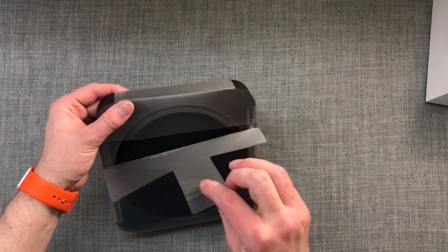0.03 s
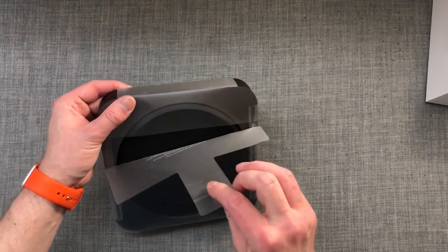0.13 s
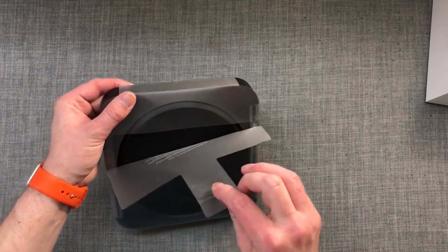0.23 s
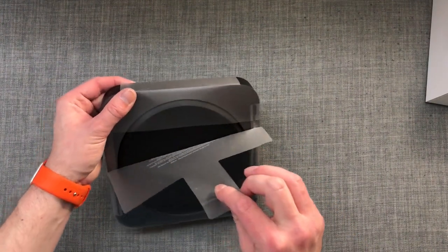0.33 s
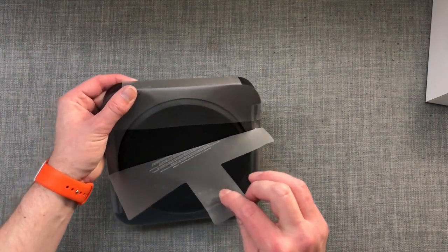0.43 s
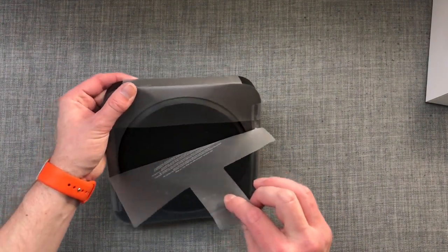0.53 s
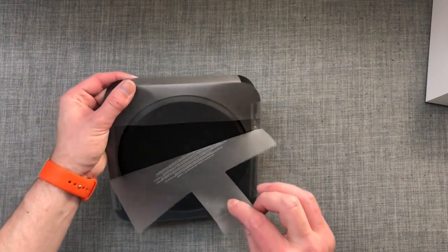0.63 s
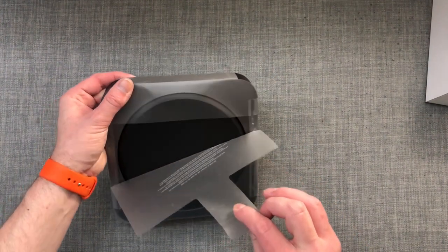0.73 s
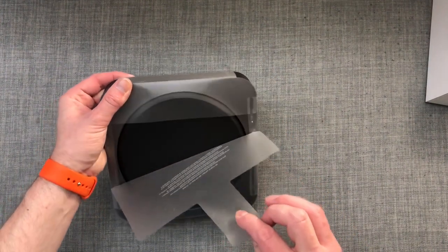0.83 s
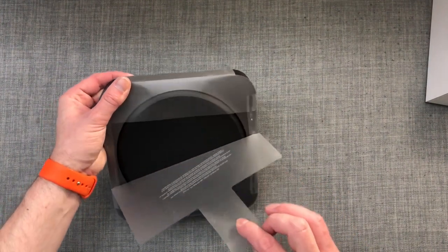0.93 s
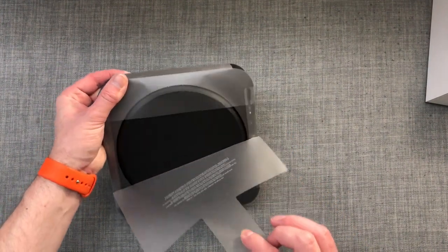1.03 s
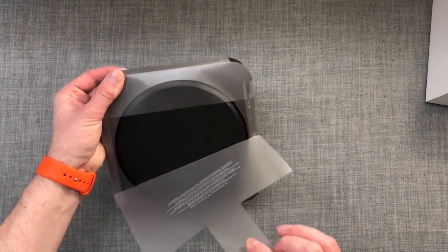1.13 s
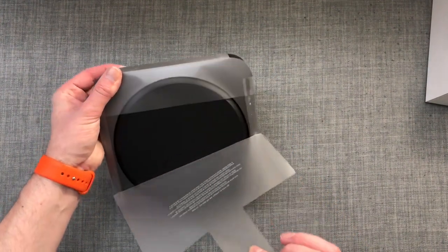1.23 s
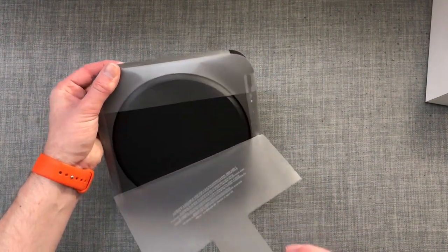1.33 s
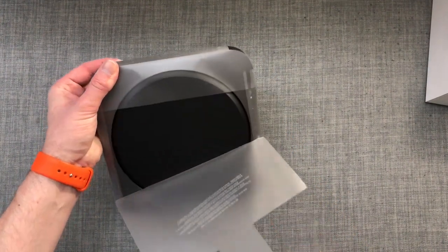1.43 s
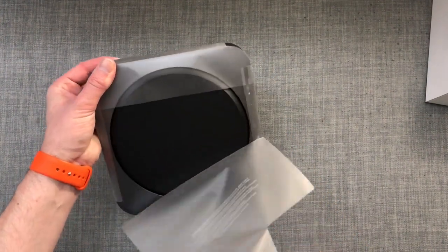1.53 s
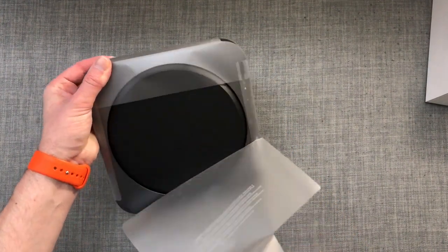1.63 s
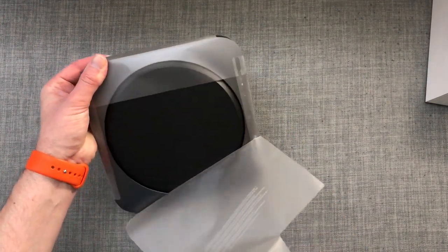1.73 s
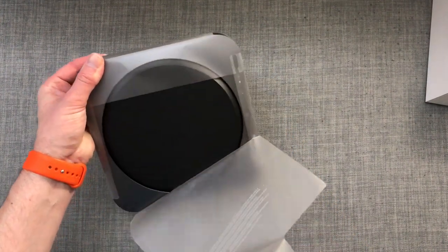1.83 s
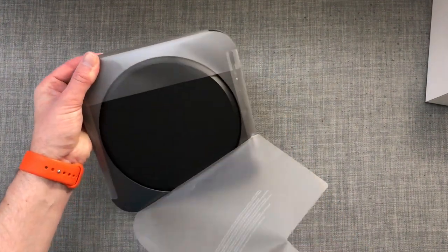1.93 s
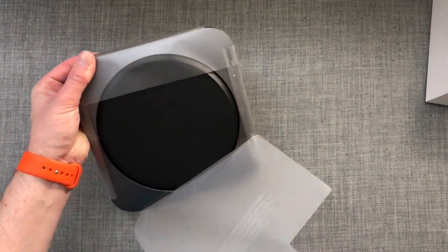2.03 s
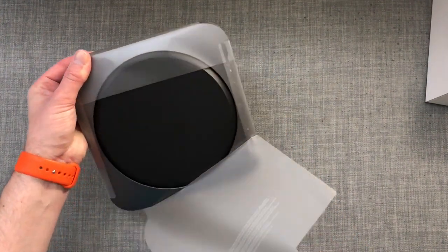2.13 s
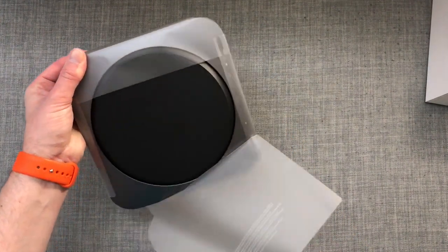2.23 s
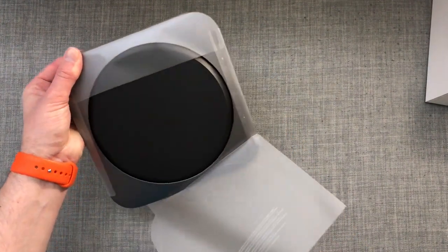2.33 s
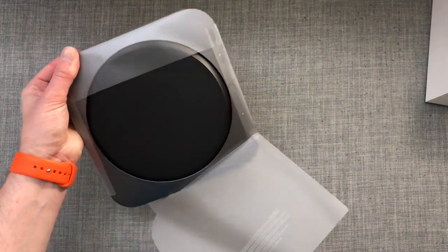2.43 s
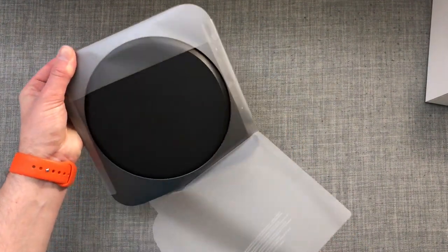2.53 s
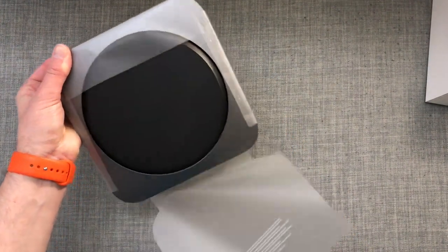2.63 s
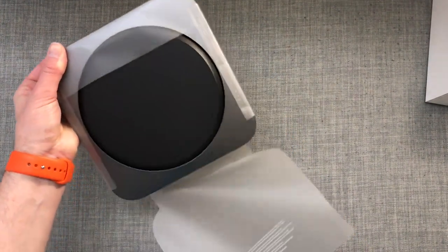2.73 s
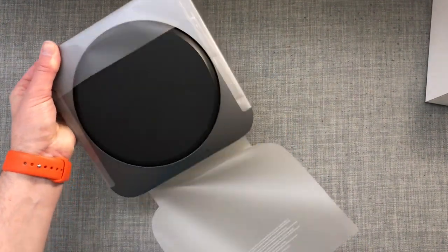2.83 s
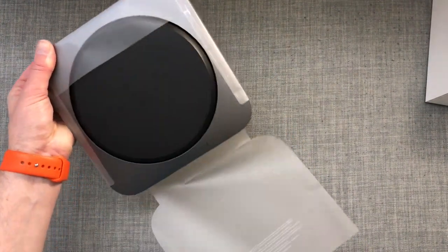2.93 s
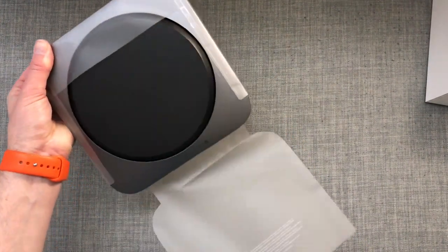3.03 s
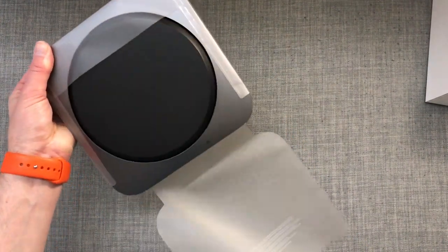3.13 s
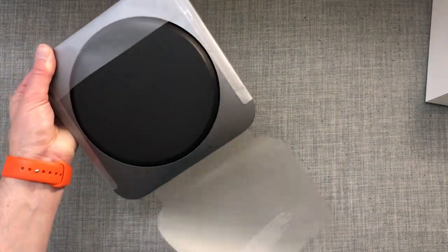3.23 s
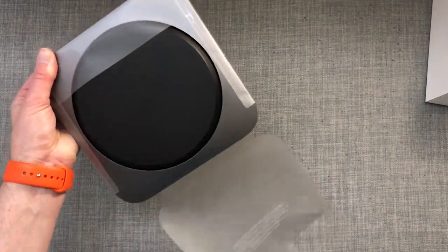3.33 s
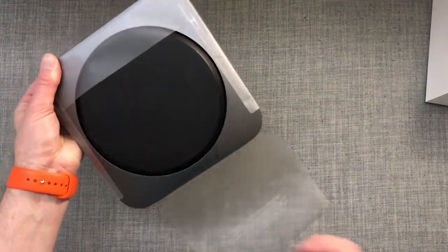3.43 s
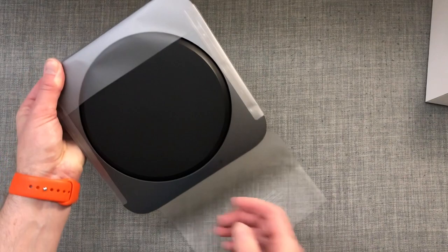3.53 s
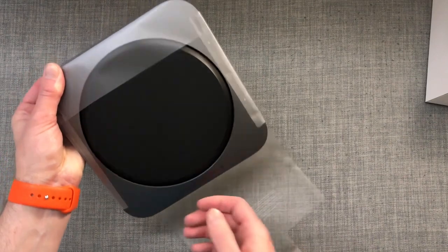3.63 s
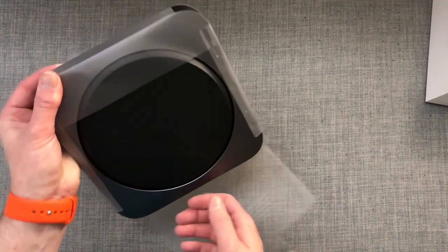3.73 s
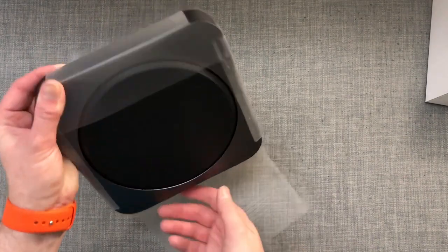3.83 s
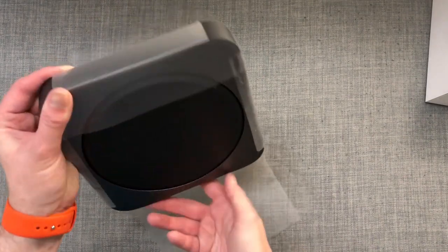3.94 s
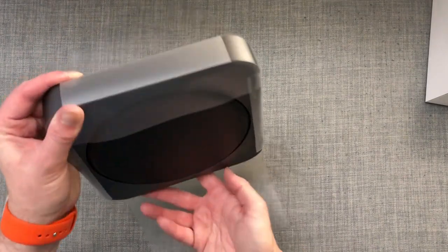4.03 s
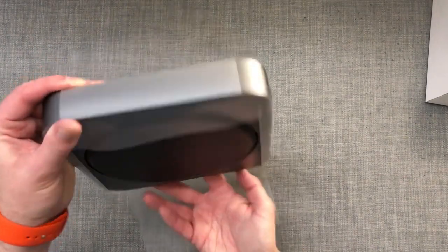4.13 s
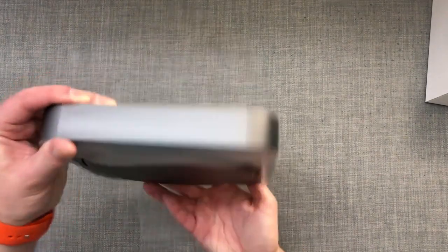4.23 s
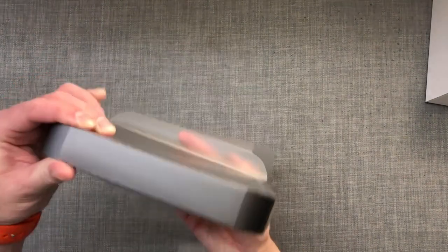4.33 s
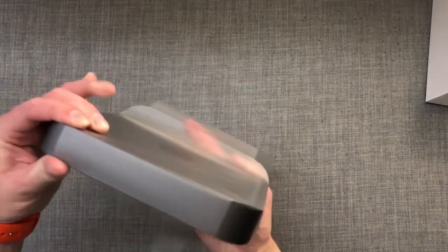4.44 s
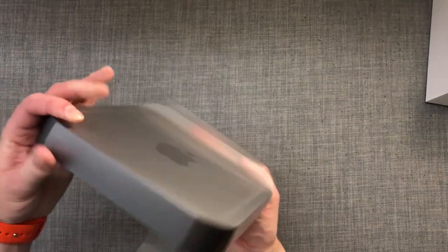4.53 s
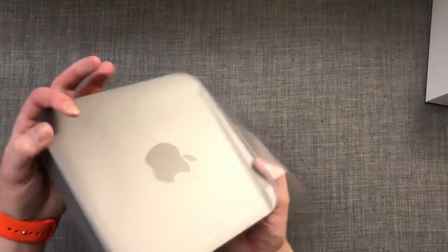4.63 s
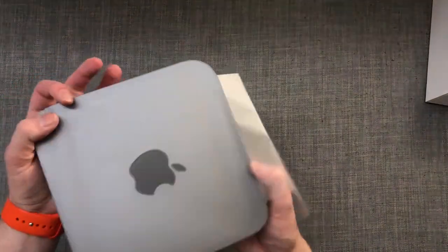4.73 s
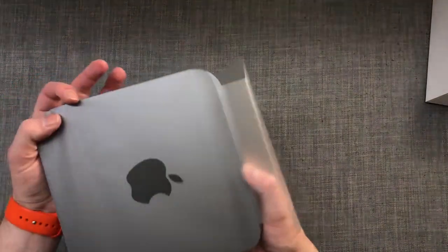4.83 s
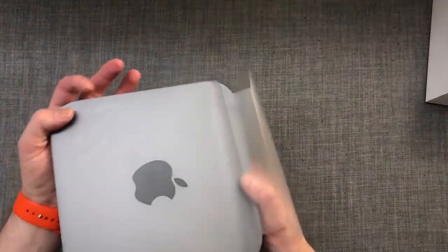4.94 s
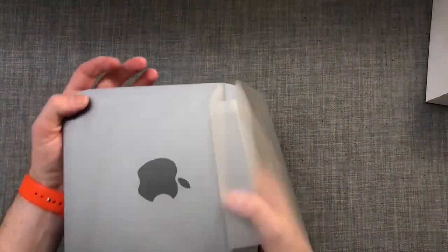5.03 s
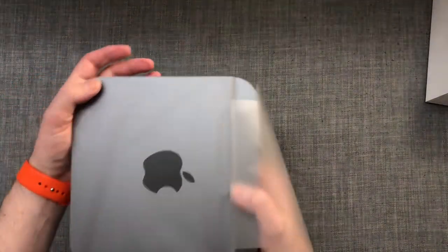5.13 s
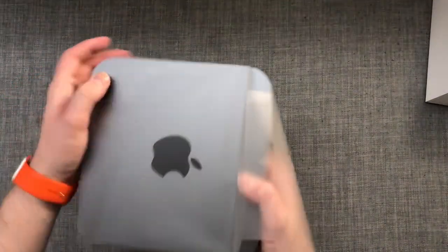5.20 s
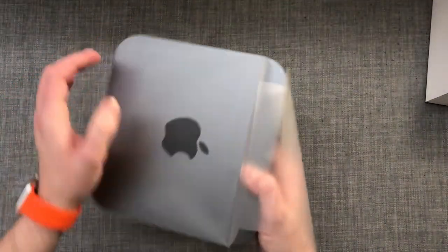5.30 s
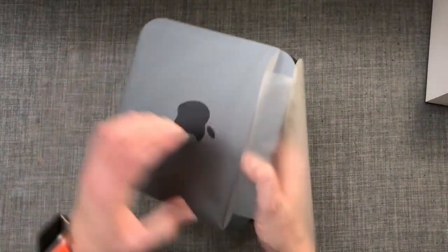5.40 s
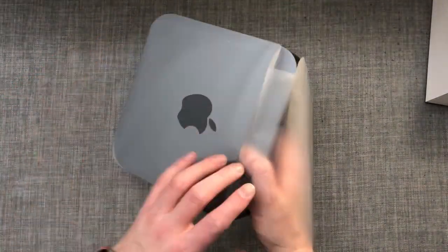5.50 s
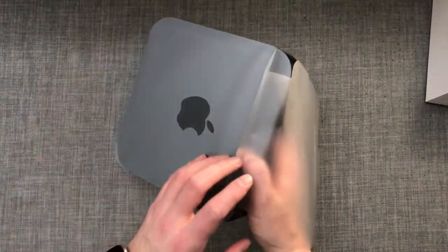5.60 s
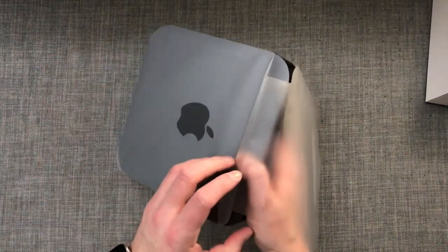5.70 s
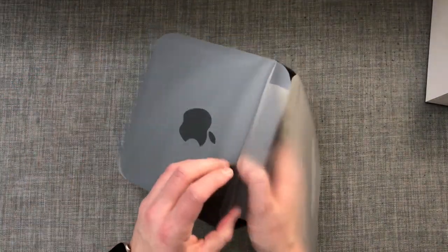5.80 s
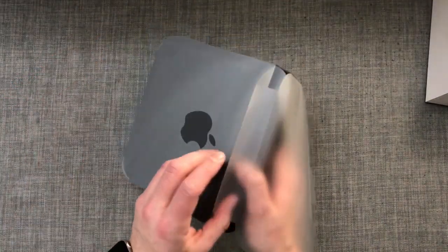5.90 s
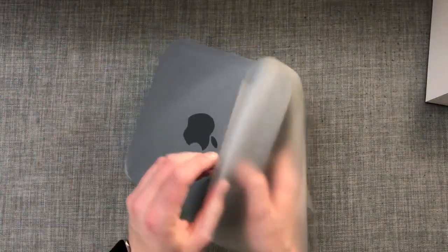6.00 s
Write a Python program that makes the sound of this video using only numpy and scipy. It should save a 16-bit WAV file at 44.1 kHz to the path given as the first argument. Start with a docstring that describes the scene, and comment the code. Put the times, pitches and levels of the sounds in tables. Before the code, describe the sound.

A quiet small room with very faint air noise and low mains hum, miked close over a cloth-covered table. From 0 s stiff film peels off a hollow metal box: bright, grainy adhesive hiss, uneven in strength, with a crisp click at the start, hard snaps around 0.7-0.8, 1.1 and 1.6 s, and light boxy thuds. The hiss thins towards 2 s; a sharp snap at 2.2 and a dense run of pops from 2.35 to 2.75 s finish the peel, with a last hissy surge near 2.7. Near silence follows, with tiny ticks and a short soft swish at 3.2 s. At 4.0 s a dull low handling bump, then faint squeaky finger drags at 4.2-4.4. Airy rustling strokes swell at 4.5-4.8, 5.05 and 5.25 s, with small ticks between. A quieter moment ends in a brighter film rustle from 5.9 s, with one loud snap at 5.96.

```python
"""A cloth-covered table in a quiet, humming room: stiff plastic wrap is peeled off a small metal box, close by.
Glue lets go as hiss: dense random ticks over noise, in bands. Creases snap: millisecond noise bursts with an echo.
Hands slide over film and lid: swelling strokes of the same rustle; dragged fingertips sing in narrow noise bands.
The hollow box thuds with the snaps and murmurs under the hands: noise through its low resonances."""
import sys
import numpy as np
from scipy import signal
from scipy.fft import rfft, irfft, next_fast_len
from scipy.io import wavfile
from scipy.ndimage import uniform_filter1d

SR = 44100
rng = np.random.default_rng(int(sys.argv[2]) if len(sys.argv) > 2 else 0)


def wrap_up_sound(samples):
    """Save the sound to the file named by the first command line argument, as 16-bit audio."""
    columns = np.atleast_2d(samples).T
    # keep every value between -1 and 1, then stretch to whole-number steps
    tamed = np.clip(columns, -1, 1)
    steps = np.round(tamed * 32767).astype(np.int16)
    wavfile.write(sys.argv[1], SR, steps)


N = 267366


def undb(db):
    """dB to gain."""
    return 10 ** (np.asarray(db) / 20)


def level(x, db):
    """Set the rms level."""
    return x * undb(db) / np.sqrt(np.mean(x ** 2))


def peak(x):
    """Scale to a peak of 1."""
    return x / np.max(np.abs(x))


def band(x, lo_hz, hi_hz, order=2):
    """Causal band-pass."""
    edges_hz = [lo_hz, min(hi_hz, .47 * SR)]
    return signal.sosfilt(signal.butter(order, edges_hz, "band", fs=SR, output="sos"), x)


def colour(x, points):
    """Shape the spectrum of a steady sound by (Hz, dB) points, interpolated over log frequency."""
    size = next_fast_len(len(x))
    hz, db = np.transpose(points)
    bin_hz = np.maximum(np.arange(size // 2 + 1) * SR / size, 1)
    gain = undb(np.interp(np.log(bin_hz), np.log(hz), db))
    return irfft(rfft(x, size) * gain, size)[:len(x)]


def walk(rate_hz):
    """Random levels held 1 / rate_hz seconds and smoothed twice; spread near 1."""
    hold = int(SR / rate_hz)
    steps = np.repeat(rng.standard_normal(N // hold + 1), hold)[:N]
    return 1.23 * uniform_filter1d(uniform_filter1d(steps, hold), hold)


# Room air spectrum. Each row: frequency in Hz, relative density in dB per Hz.
ROOM_SPECTRUM = [(15, -37.5), (25, -14.5), (72, -1.5), (129, -3), (169, -7), (291, -3.5), (570, -13.5),
                 (977, -15.5), (1630, -23.5), (5200, -25.5), (12700, -29.5), (15700, -33.5)]
ROOM_DB = -69  # rms
# Mains and a motor beating against it. Each row: frequency in Hz, mean level in dB rms.
HUM_TONES = [(60, -81), (65, -71), (120, -78)]


def room():
    """Coloured air noise plus hum tones, all slowly wavering in level."""
    t = np.arange(N) / SR
    hum = 0
    for hz, db in HUM_TONES:
        hum = hum + undb(db + 2.0 * walk(2.1)) * np.sqrt(2) * np.sin(2 * np.pi * hz * t)
    air = level(colour(rng.standard_normal(N), ROOM_SPECTRUM), ROOM_DB)
    return air * undb(.6 * walk(1.3)) + hum


# Resonances of the box lying on the cloth. Each row: centre in Hz, width in Hz, gain in dB.
BOX_ON_CLOTH = [(347, 106, 2), (481, 270, 0), (248, 140, -4.5)]
# Resonances of the box lifted off the cloth, ringing freely. Each row: centre in Hz, width in Hz, gain in dB.
BOX_HELD = [(355.4, 43, -0.5), (413.7, 75, -6), (490, 67, -10), (278.4, 81, -8.5)]


def box(x, modes):
    """The air and walls of the box ring low and briefly: parallel band-passes."""
    return sum(undb(db) * band(x, hz - width / 2, hz + width / 2) for hz, width, db in modes)


def ticks(rate_hz, scatter_db):
    """Random slips of the glue; a few are far larger than the rest."""
    happens = rng.random(N) < rate_hz / SR
    return happens * rng.standard_normal(N) * undb(scatter_db * rng.exponential(size=N))


def rustle(controls, modes, tick_share, flicker_db, slope_db_per_octave, patchy_db):
    """Dense ticks over rubbing noise; the loose sheet colours it with a sliding hump and wandering patches."""
    hump_hz, hiss_gain, top_gain, mid_gain, box_gain = controls
    slips = tick_share * level(ticks(3000., 2.9), 0)
    flicker = undb(flicker_db * walk(50))

    def grain():
        """Fresh noise with shared slips and flicker, so every band slips at once."""
        return flicker * (slips * rng.standard_normal(N) + rng.standard_normal(N))

    def patch(lo_hz, hi_hz):
        """One band of grain, wandering in level."""
        return level(band(grain(), lo_hz, hi_hz), 0) * undb(patchy_db * walk(5))

    centres_hz = 3300 * 2 ** np.arange(0, 1.5, .24)
    hump = np.array([undb(-slope_db_per_octave * np.abs(np.log2(hz / hump_hz))) * np.sqrt(hz)
                     for hz in centres_hz])
    hump = hump / np.sqrt(np.sum(hump ** 2, axis=0))  # constant power as the hump slides
    hiss = sum(gain * patch(hz / 1.09, hz * 1.09) for hz, gain in zip(centres_hz, hump))
    top = 0.58 * patch(9500, 11500) + 0.51 * patch(11220, 13500) + 0.36 * patch(13500, 15700)
    mid = level(band(grain() * undb(2.5 * walk(30)), 800, 3100), 0)
    murmur = level(box(rng.standard_normal(N) * undb(2.4 * walk(30)), modes), 0)
    return hiss * hiss_gain + top * top_gain + mid * mid_gain + murmur * box_gain


def table_bounce(x, share, delay_ms, sway_ms):
    """The table returns the sound a little later; as the hands move the film, the comb of this bounce slides."""
    lag_ms = np.clip(delay_ms + sway_ms * walk(2.5), .2, 4)
    late = np.arange(N) - SR / 1000 * lag_ms
    return (x + share * np.interp(late, np.arange(N), x)) / np.sqrt(1 + share ** 2)


# A fingertip drags on the film. Each row: start in seconds, length in seconds, centre in Hz,
# level in dB rms before the swell is applied.
FINGER_DRAGS = [(4.207, 0.045, 3450, -66), (4.21, .05, 4900, -72), (4.27, .07, 3130, -68),
                (4.35, 0.091, 2950, -69)]
DRAG_WIDTH_HZ = 260


def drags():
    """The dragged film sings faintly: narrow noise bands that swell and fade with each drag."""
    t = np.arange(N) / SR
    out = np.zeros(N)
    for start, length, hz, db in FINGER_DRAGS:
        song = level(band(rng.standard_normal(N), hz - DRAG_WIDTH_HZ / 2, hz + DRAG_WIDTH_HZ / 2), db)
        arch = np.sin(np.pi * np.clip((t - start) / length, 0, 1)).clip(0)
        out += song * np.sqrt(arch)
    return out


# Hands and film slide over the lid. Each row: strongest moment in seconds, rise in seconds, fall in seconds,
# hiss in dB at that moment, swell in dB from the ends up to it, hiss centre in Hz,
# top in dB re hiss, middle in dB re hiss.
HAND_STROKES = [(3.245, .045, 0.043, -52.5, 9, 4600, -1.5, -8.5), (3.22, .09, 0.12, -70, 5, 3600, -21, 8),
                (3.397, 0.0096, 0.016, -67.5, 3, 5600, 2.5, -1), (3.901, .14, 0.16, -77, 4, 6100, -2, -6.5),
                (4.035, 0.026, 0.021, -67, 6, 3800, -12, 1), (4.17, 0.096, 0.038, -65, 9, 3700, -3.5, 0),
                (4.23, 0.024, 0.074, -63, 4, 3370, -5.5, -3.5),
                (4.33, 0.027, 0.039, -57.5, 5, 5200, -1.5, -4), (4.4, 0.042, 0.051, -58, 8, 5950, 0, -3.5),
                (4.5, 0.048, 0.035, -53.5, 7.5, 4830, -4.5, -3),
                (4.55, 0.028, 0.019, -68.5, -2.5, 5200, 0, 4.5),
                (4.62, 0.053, 0.065, -50.5, 7.5, 7250, -1, -9),
                (4.8, .13, 0.085, -45.5, 11, 7560, -3.5, -11.5),
                (4.91, 0.014, 0.16, -62.5, 0.5, 4900, -4, -1.5),
                (5.07, 0.042, 0.081, -50.5, 20.5, 4840, -1.5, -4),
                (5.17, 0.06, 0.081, -67, 4, 4000, -13, 5.5), (5.281, 0.12, 0.046, -49, 12, 7820, 0.5, -13),
                (5.41, 0.16, 0.12, -78.5, 10, 4500, -3, 5), (5.6, 0.016, 0.039, -65, 11.5, 3600, 0.5, 13),
                (5.7, 0.076, 0.041, -61.5, 5, 4430, -3, -2), (5.79, 0.046, 0.068, -76, 7, 4930, -2.5, 5.5),
                (5.941, 0.099, .04, -48, 12, 4900, -4, -4.5), (6.03, 0.046, 0.14, -47, 7, 5200, -5, -2)]
STROKE_EDGE_S, STROKE_MURMUR_DB = 0.019, -10.5  # on/off ramp; box murmur re middle band
# Fingers shift their grip and the box hums. Each row: start in seconds, peak gain in dB, rise in seconds.
HAND_GRIPS = [(4.035, -38.5, 0.0051), (4.09, -61.5, 0.01), (4.158, -55, 0.0092), (4.32, -67.5, .015),
              (4.415, -62, 0.0083), (4.496, -57, 0.01), (4.61, -58, 0.021), (4.73, -56, 0.036),
              (4.78, -52, 0.032), (5.063, -50, .012), (5.28, -68, 0.022), (5.395, -61, 0.0047),
              (5.59, -68, 0.022), (5.67, -66.5, 0.034), (5.775, -58.5, 0.014)]


def stroking():
    """Rustle controls for the hands: strokes set in, change level and stop; grips rise fast and fade slowly."""
    t = np.arange(N) / SR
    hiss, top, mid, weighted_hz, grips = np.full((5, N), 1e-9)  # floor avoids 0 / 0
    for strongest, rise, fall, db, swell_db, hz, top_db, mid_db in HAND_STROKES:
        start, end = strongest - rise, strongest + fall
        edges = np.clip(np.minimum(t - start, end - t) / STROKE_EDGE_S + .5, 0, 1)
        swell = np.interp(t, [start, strongest, end], [-swell_db, 0, -swell_db])
        gain = edges * undb(db + swell)
        hiss = hiss + gain
        top = top + gain * undb(top_db)
        mid = mid + gain * undb(mid_db)
        weighted_hz = weighted_hz + gain * hz
    for start, db, rise in HAND_GRIPS:
        age = np.maximum(t - start, 0) / rise
        grips = grips + undb(db) * age * np.exp(1 - age)
    hump_hz = np.maximum(weighted_hz / hiss, 1000)
    return hump_hz, hiss, top, mid, mid * undb(STROKE_MURMUR_DB) + grips


# Glue letting go. Each row: time in seconds, hiss in dB, hiss centre in Hz, top in dB re hiss,
# middle in dB re hiss, box murmur in dB re hiss.
GLUE_RELEASE = [(0.0, -54, 4900, -2.5, -4.5, -4.5), (0.11, -52.5, 6750, -0.5, -9.5, -18),
                (0.25, -56.5, 5100, -4.5, -7, -16), (0.345, -55.5, 4760, -5, -11, -12),
                (0.385, -49.5, 4800, -2, -12, -35), (0.5, -57.5, 5970, -2, -6.5, -8),
                (0.61, -58.5, 6140, 0, -6.5, -10), (0.66, -53.5, 7100, 0.5, -9, -26),
                (0.73, -50, 6600, -0.5, -15.5, -24), (0.8, -52.5, 6900, -5, -10, -8),
                (0.87, -50, 6560, -6, -12.5, -15), (0.93, -54.5, 6600, -6, -12, -23),
                (0.98, -51, 6600, -5, -11.5, -10.5), (1.18, -52, 5900, -3.5, -8.5, -12),
                (1.27, -61.5, 6550, -8, -9, -18), (1.46, -52, 5900, -1.5, -10, -15.5),
                (1.55, -53.5, 7300, -6.5, -11, -4), (1.65, -53, 5300, -5, -3, 5),
                (1.76, -59, 5200, -6, -7.5, -12), (1.9, -56.5, 6900, -6, -13, -23),
                (2.0, -70.5, 6300, -4, -3.5, -5), (2.06, -62, 6200, -1, -6, -11),
                (2.12, -57, 6200, -9, -5.5, -3), (2.27, -60.5, 8200, -5, -5, 4.5),
                (2.32, -63, 6700, -4, 2, 1), (2.48, -51.5, 5800, -8, -4, 0.5),
                (2.6, -61.5, 6100, 2, -4, -10), (2.68, -45.5, 6300, -17, -4, -8),
                (2.76, -67, 3930, -17, 0, 3), (2.9, -92.5, 4500, -4.5, 3, -9)]


def peeling():
    """Rustle controls while the glue lets go, interpolated between rows; silent after the last."""
    s, *columns = np.transpose(GLUE_RELEASE)
    t = np.arange(N) / SR
    db, hump_hz, top_db, mid_db, box_db = (np.interp(t, s, column) for column in columns)
    hiss = undb(db) * (t <= s[-1])
    return hump_hz, hiss, hiss * undb(top_db), hiss * undb(mid_db), hiss * undb(box_db)


# Diffuse tail of table and walls. Each row: band centre in Hz, T60 in seconds, band gain in dB.
ECHO_BANDS = [(370, 0.28, -13.5), (1390, 0.19, -11), (4070, 0.2, -17), (10100, 0.072, -21.5)]


def echo(x):
    """Table and walls return a diffuse tail, shortest in the treble: convolution with decaying noise bands."""
    t = np.arange(int(.4 * SR)) / SR
    tail = 0
    for hz, t60, db in ECHO_BANDS:
        envelope = 10 ** (-3 * t / t60) * (1 - np.exp(-t / 0.00033))
        part = band(rng.standard_normal(len(t)), hz / 2.8, hz * 2.15) * envelope
        part = part / np.sqrt(np.sum(part ** 2))
        tail = tail + undb(db) * part * np.sqrt(hz / 10000)
    return signal.fftconvolve(x, tail)[:N]


# Creases that snap. Each row: time in seconds, body peak in dB, body centre in Hz, middle centre in Hz,
# middle in dB re peak, top in dB re peak, burst time scale in ms.
CREASE_SNAPS = [(0.0094, -17.5, 3800, 2320, -10, 2.5, 0.47), (0.3583, -37, 10500, 2830, -10, 5, 3.9),
                (0.7074, -21, 9000, 2920, -14.5, -24, 0.95), (0.7509, -10, 9600, 2680, -7, -32, 0.85),
                (0.7553, -19, 6260, 2900, -22, -15, 7.7), (0.775, -4.5, 7160, 800, -31, -18, 0.57),
                (0.8104, -33.5, 3650, 2750, -5, -26, 3.9), (0.9621, -30, 7340, 2790, -15, -12, 1.5),
                (1.065, -14, 7600, 810, -19, -1.5, 0.45), (1.076, -12, 7240, 3060, -10.5, -23, 0.27),
                (1.1296, -15.5, 6700, 1820, -6, -19, 1.3), (1.283, -36, 6800, 2830, -34, -22, 1.1),
                (1.5354, -42, 6330, 837, 3, -15, 1.1), (1.5535, -41, 6360, 1770, 1.5, -14, 1.1),
                (1.578, -39, 3500, 1000, -6, -18, 1.4), (1.5973, -6, 8300, 3000, -17, -9, 1.23),
                (1.6217, -9.5, 6030, 1590, -19, -3.5, 0.76), (1.939, -47, 6870, 1600, -2, -16, 0.84),
                (2.0985, -35, 8090, 2850, -10, -9, 0.7), (2.2031, -42.5, 3700, 1100, 7.5, -8, 0.26),
                (2.2189, -5.5, 8900, 2450, -12, -23, 0.81), (2.3471, -47, 3280, 1530, 1.5, -2, 0.32),
                (2.362, -13, 6600, 1010, -9, -16, 0.66), (2.3751, -11.5, 7260, 1070, -10, -5, 1.6),
                (2.4243, -10.5, 7700, 2430, -20.5, -21, 1.2), (2.4404, -10.5, 7440, 1120, -21.5, -9, 0.89),
                (2.4615, -16, 5440, 1230, 0, -2, 0.44), (2.5606, -10, 5760, 2190, -14.5, -9, 0.5),
                (2.5927, -19.5, 8600, 1240, -6.5, -12, 0.7), (2.6485, -10, 6500, 2900, -8.5, -13, 0.91),
                (2.6746, -23, 5860, 2245, -7, -6, 0.45), (2.7098, -21.5, 4380, 1573, -8, -27, 0.59),
                (2.749, -26, 3060, 2950, -5, 5.5, 1), (3.016, -53, 3290, 1060, -0.5, -22, 0.9),
                (3.1018, -31, 3070, 870, -6, -9, 1.6), (3.1362, -43.5, 3030, 1140, -1.5, -29, 2.3),
                (3.1689, -42.5, 3060, 1300, 1, -25, 0.93), (3.1954, -32.5, 3720, 1710, 2, -26, 0.15),
                (3.2218, -26.5, 4450, 1920, -13, -7, 0.76), (3.2592, -40, 3330, 1910, -1, -14, 0.93),
                (3.277, -45, 3720, 1370, -1, -26, 1.1), (3.3019, -48, 5110, 1168, 9.5, -28, 0.55),
                (3.702, -53, 5100, 952, -16.5, -21.5, 0.86), (4.019, -40.5, 3750, 1140, 0, -24, 2.25),
                (4.0318, -30.5, 3500, 1070, -8.5, -30.5, 0.42), (4.1043, -51.5, 3450, 1130, 3, -15, 1.7),
                (4.1667, -52.5, 3550, 1057, 8, -16, 4.7), (4.561, -45.5, 5070, 1570, 0.5, -11, 3.2),
                (4.8844, -24.5, 6400, 2220, -23, -34, 0.36), (4.9758, -33, 6140, 2640, -24, -15, 0.69),
                (5.0527, -40.5, 3560, 2830, -6.5, -18, 6.8), (5.0698, -42, 4120, 2810, -2, -15, 2.2),
                (5.0889, -41.5, 3230, 1740, 2.5, -25, 1.3), (5.161, -46.5, 3070, 1800, 3, -19, 2.3),
                (5.459, -58, 3300, 2870, 0.5, -32, 0.91), (5.4969, -61, 3280, 2030, 16, -34, 1.3),
                (5.5891, -49, 3440, 1980, 10.5, -19, 0.75), (5.6027, -40, 3100, 2170, 8.5, -33, 0.73),
                (5.8274, -39.5, 5700, 2090, -6.5, -7, 3.2), (5.913, -37, 3030, 2770, -10, -6, 0.59),
                (5.9411, -25.5, 3320, 2900, -5, -5, 0.85), (5.9603, -9.5, 8500, 2270, -10.5, -30, 0.71)]
# The thud grows less than in proportion: peak dB = THUD_DB + THUD_FOLLOWS * middle-band peak dB.
THUD_DB, THUD_FOLLOWS = -20.5, 0.75


def snaps():
    """A crease flips: a brief noise burst; bending waves in the sheet bring the lows later; the box thuds."""
    out, t = np.zeros(N + 2048), np.arange(2048) / SR
    for s, db, hz, mid_hz, mid_db, top_db, ms in CREASE_SNAPS:
        noise = rng.standard_normal((5, len(t)))
        tau_s = np.clip(ms, .1, 8) / 1000

        def burst(stretch):
            """Rise and decay over the stretched time scale, plus a weak longer tail."""
            return t * np.exp(-t / (tau_s * stretch)) + 0.035 * tau_s * np.exp(-t / 0.0025)

        body = peak(band(noise[0] * burst(0.32), hz / 1.51, hz * 1.42))
        top = undb(top_db) * peak(band(noise[1] * burst(.3), 11000, 18000))
        bend = noise[2] * burst(1.1)
        bend_peak = band(bend, mid_hz / 1.157, mid_hz * 1.213, order=1)
        mid = undb(mid_db) * peak(band(bend, 800, 2200) + 4.1 * bend_peak)
        push = noise[3] * burst(2.98)
        thud_gain = undb(THUD_DB + THUD_FOLLOWS * (db + mid_db))
        thud = thud_gain * peak(.5 * band(push, 160, 1200) + box(push, BOX_ON_CLOTH))
        # the sheet around the crease crackles on while it settles
        crackle = noise[4] * (1 - np.exp(-t / 0.0008)) * np.exp(-t / 0.015)
        settle = undb(-22.5) * peak(band(crackle, 430, 12000, order=1))
        i = int((s + .0009) * SR)  # the snap sounds 0.9 ms after its listed time
        out[i:i + len(t)] += undb(db) * (body + top + mid + settle) + thud
    return out[:N]


def scene():
    """Snaps with their echo, peeling and rubbing over the table, finger drags, the room."""
    creases = snaps()
    peel = rustle(peeling(), BOX_ON_CLOTH, tick_share=0.89, flicker_db=1.5, slope_db_per_octave=4.0, patchy_db=2.4)
    rubs = rustle(stroking(), BOX_HELD, tick_share=0.59, flicker_db=2.5, slope_db_per_octave=7.5, patchy_db=-1.0)
    film = table_bounce(peel + rubs, share=0.14, delay_ms=0.78, sway_ms=0.11)
    return (creases + echo(creases) + film + room() + drags())[None]


def record(dry):
    """The microphone drops the deepest bass; a steep low-pass cuts the top."""
    dry = signal.sosfilt(signal.butter(2, 38, "high", fs=SR, output="sos"), dry)
    return signal.sosfilt(signal.ellip(10, .2, 75, 16100, fs=SR, output="sos"), dry)


dry = scene()
out = record(dry)
wrap_up_sound(out)
```